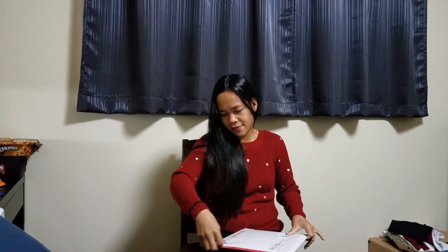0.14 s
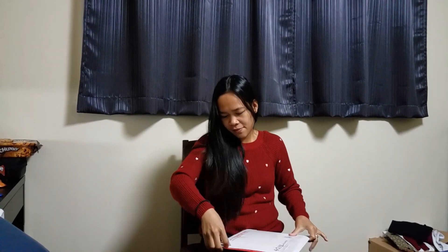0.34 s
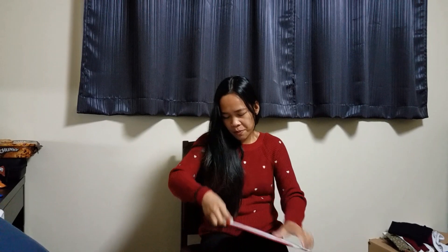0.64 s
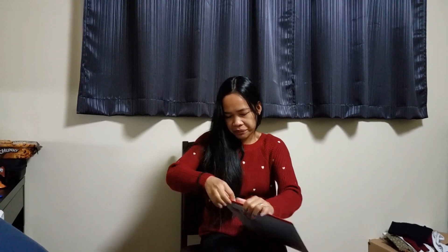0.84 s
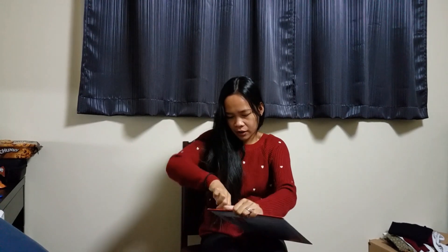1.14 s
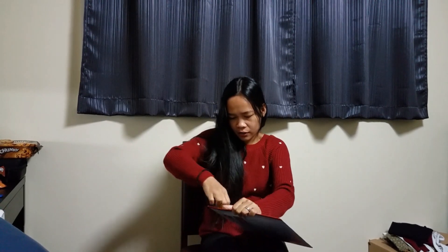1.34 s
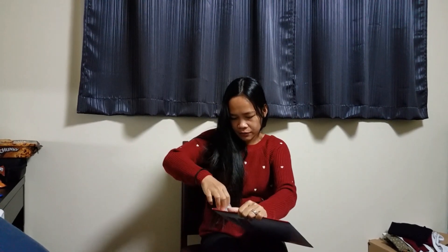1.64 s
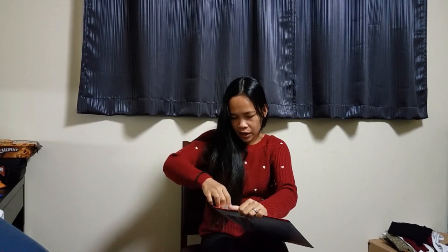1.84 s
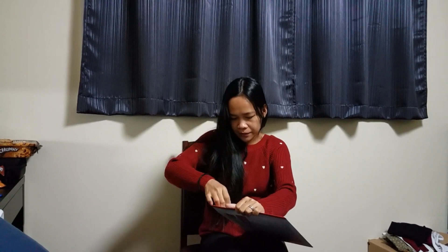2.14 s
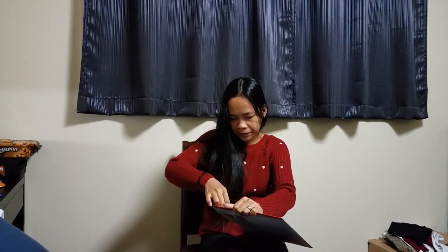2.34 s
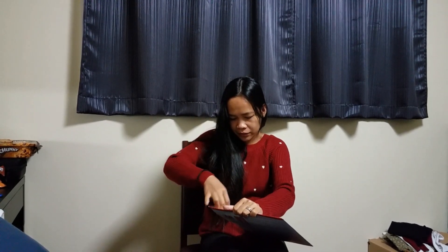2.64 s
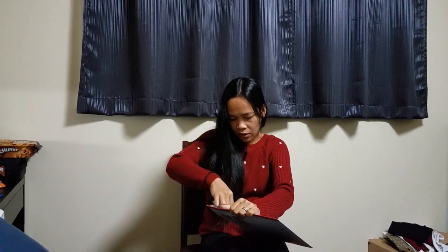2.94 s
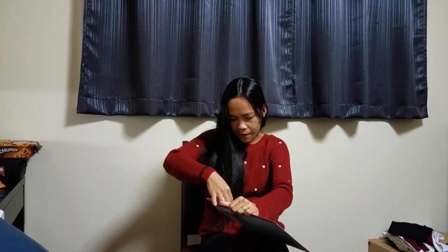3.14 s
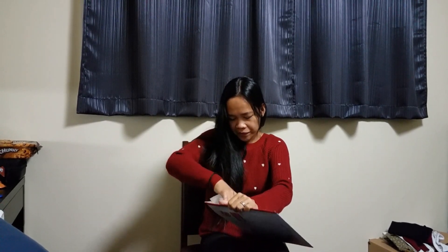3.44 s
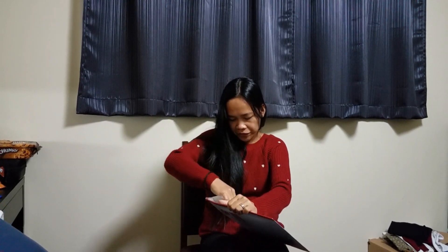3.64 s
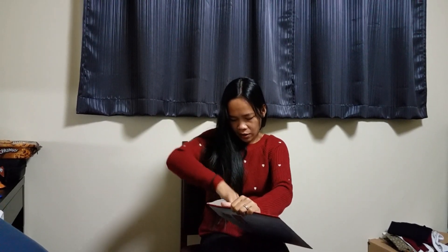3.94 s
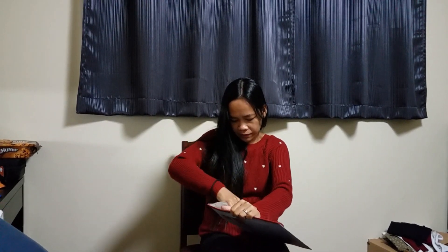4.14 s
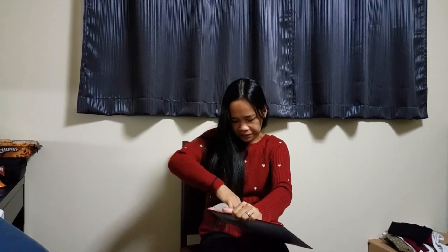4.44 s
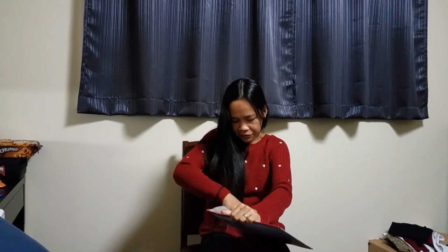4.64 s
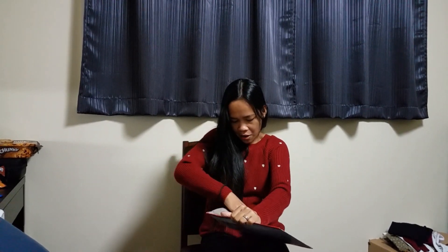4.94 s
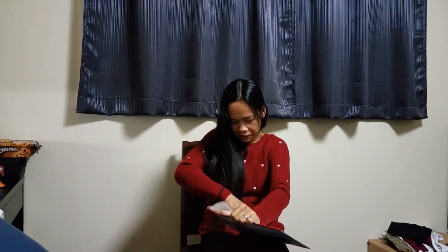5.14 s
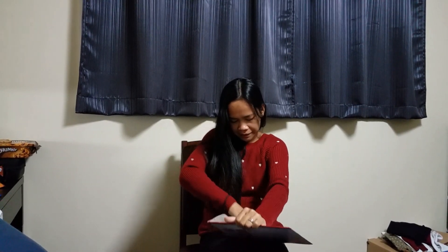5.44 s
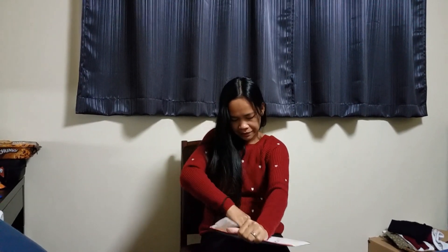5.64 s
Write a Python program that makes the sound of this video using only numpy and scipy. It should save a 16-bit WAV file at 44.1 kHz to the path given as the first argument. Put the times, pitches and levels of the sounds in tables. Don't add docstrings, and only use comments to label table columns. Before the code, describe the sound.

In a small quiet room, a few steps from a stereo microphone, hands pick at a stiff paper envelope. Faint ticks and rustles come first, then a sharp crackling rip at about 1.3 seconds. After a lull of light picking, tearing resumes in short pulls, with a loud pop just after 4 seconds and more crisp rips to the end. Faint hum and hiss lie underneath.

```python
import sys
import numpy as np
from scipy import signal
from scipy.fft import rfft, irfft
from scipy.io import wavfile
from scipy.ndimage import uniform_filter1d

SR = 44100
rng = np.random.default_rng(int(sys.argv[2]) if len(sys.argv) > 2 else 0)


def voltage_ratio(decibels):
    exponent = np.asarray(decibels, float) / 20
    return 10 ** exponent


def pcm_store(signal):
    levels = np.round(np.clip(np.atleast_2d(signal), -1, 1) * 32767)
    wavfile.write(sys.argv[1], SR, levels.astype(np.int16).T)


N = 255780
FLAT_HZ = 15000


def tearing():
    # [t/s, hold/s, crackle level/dB, sheet re crackle/dB, pouch re crackle/dB]
    rips = [(.202, .01, -46, -4.5, -3), (.214, 0.0054, -43, -4.5, -5), (.542, 0.067, -64.5, -8, -22),
            (1.0, .002, -72, -20, -22), (1.329, 0.02, -35.5, -11, -13.5), (1.353, 0.047, -28.5, -11.5, -16),
            (1.378, 0.028, -28, -7.5, -13.5), (1.51, 0.008, -50, -0.5, -4), (1.521, 0.0049, -48, -8.5, -16),
            (4.052, 0.016, -44.5, -12, -10), (2.024, 0.0018, -56.5, -8.5, -26),
            (2.194, 0.032, -56, -13.5, -8), (2.806, 0.02, -51, -28, -13), (3.34, 0.054, -55.5, -6, -0.5),
            (3.613, 0.049, -39.5, -10, -3), (3.64, 0.051, -38, -6.5, -1.5), (4.0715, .002, -38, 2.5, -23),
            (4.075, 0.12, -43.5, -8, -5), (4.2145, 0.0031, -37, 5, 1), (4.225, 0.031, -42, -8, 1),
            (4.865, 0.0046, -45.5, 2.5, -0.5), (5.11, 0.045, -36.5, -8.5, -13),
            (5.315, 0.01, -52.5, 1.5, -3.5), (5.426, 0.031, -55, -4.5, -9), (5.537, 0.01, -42.5, -23, 0.5),
            (5.552, 0.022, -32.5, -12.5, -23), (5.575, 0.053, -40, -5, -8), (5.76, .04, -55, 2.5, 10)]
    # [t of full force/s, then as for the rips]
    pulls = [(.062, 0.095, -63.5, -9, -25), (.77, 0.087, -64.5, -6, -11), (1.72, 0.28, -66, -1.5, -7),
             (2.395, 0.024, -49, -17, -14), (2.436, 0.046, -42.5, -12, -12), (2.5, .002, -59.5, 1, -18),
             (2.7, .002, -58.5, -10, -24), (2.87, 0.0017, -47.5, -6.5, -10), (2.99, 0.042, -44, -11.5, -12),
             (3.052, 0.033, -37, -8.5, -9), (3.308, .002, -53, -7, -23), (3.41, .002, -61, -16, -6),
             (3.464, 0.014, -45, -9.5, -22), (3.61, .002, -50, -22, -19), (3.9, 0.048, -60, -3.5, 2),
             (4.05, .002, -51, -12, -8.5), (4.5, 0.065, -57, -24, -21), (4.65, 0.03, -38, -9, -11),
             (4.7, 0.062, -53.5, -2.5, 1), (4.847, 0.0018, -53.5, 3, -2.5), (5.1, .002, -39.5, -9.5, -8.5),
             (5.17, 0.0067, -47, -19, -3), (5.49, 0.063, -47, -14.5, -11)]
    # [t/s, level/dB]
    grip = [(0, -73), (.35, -72.5), (.68, -84), (1.1, -72.5), (1.25, -80), (1.6, -72), (2.12, -83),
            (2.3, -77), (2.6, -63.5), (2.77, -75.5), (3.2, -63.5), (3.85, -63.5), (4.35, -61), (4.45, -58),
            (4.95, -65.5), (5.3, -57.5), (5.42, -67), (5.8, -55)]
    # [crackle/dB, sheet/dB, pouch/dB, flap/dB]
    grip_share = (2, -2, -2, -3)
    # [f/Hz, level/dB]
    fibre_tone = [(1760, -52), (3000, -1), (4130, -9.5), (4580, -3.5), (5590, -3.5), (6700, -1),
                  (9740, 1.5), (10700, 2.5), (15100, 3), (15700, -37)]
    # [f/Hz, level/dB]
    sheet_tone = [(700, -25), (1200, -6), (1550, -1.5), (2300, -3), (3100, -4), (4300, -11), (6000, -24),
                  (10000, -70)]
    # [f/Hz, width/Hz, level/dB]
    pouch_modes = [(545, 80, -6), (691, 170, -2), (790, 80, 2), (880, 113, -4), (990, 193, -8)]
    # [f/Hz, width/Hz, level/dB]
    flap_modes = [(212, 69, 7.5), (305, 250, -5)]

    t = np.arange(N // 32 + 1) * 32 / SR
    grip_db = np.interp(t, *np.transpose(grip)) + np.array(grip_share)[:, None]
    power = voltage_ratio(grip_db) ** 2
    power = power + force(rips, 6000, t) + force(pulls, 235, t)

    fibre = colour(clicks(4000, 2.4, 2.0, 8.8), fibre_tone)
    sheet = colour(clicks(1800, 3.2, 2.6, 6.5), sheet_tone)
    slips = clicks(700, 4.5, 2.4, 11)
    squeeze = 1 + 0.03 * slow_noise(int(0.06 * SR))
    pouch = sum(voltage_ratio(db) * sway(slips, hz * squeeze, 1.4 * width) for hz, width, db in pouch_modes)
    flap = np.zeros(N)
    for hz, width, db in flap_modes:
        flap += voltage_ratio(db) * resonate(resonate(slips, hz, 2 * width), hz, width)

    out = np.zeros(N)
    for level, layer in zip(np.sqrt(power), (fibre, sheet, pouch, flap)):
        out += np.interp(np.arange(N) / SR, t, level) * evened(layer)
    return voltage_ratio(-3.0) * out


def force(table, swell_db_per_s, t):
    # [crackle/dB per s, sheet, pouch, flap]
    fades = (332, 346, 285, 230)
    s, hold, db, sheet_db, pouch_db = np.transpose(table)[:, :, None]
    early = np.maximum(s - t, 0)
    late = np.maximum(t - s - hold, 0)
    flap_db = pouch_db - 6.5
    layers = []
    for rel_db, fade in zip((0, sheet_db, pouch_db, flap_db), fades):
        stroke_db = db + rel_db - swell_db_per_s * early - fade * late
        layers.append((voltage_ratio(stroke_db) ** 2).sum(0))
    return np.array(layers)


def clicks(per_s, spread_db, clump_db, clump_ms):
    size = voltage_ratio(spread_db * np.minimum(rng.exponential(1, N), 4)) * rng.choice([-1, 1], N)
    clump = slow_noise(max(int(clump_ms * SR / 1000), 2))
    happens = rng.random(N) < per_s / SR
    return size * happens * voltage_ratio(clump_db * clump)


def buckling_folds():
    # [t/s, peak level/dB, f/Hz, bare tick re ring/dB]
    pops = [(.212, -47, 540, -25), (.761, -56, 480, 10), (.953, -53, 506, -2), (1.329, -28.5, 760, -5.5),
            (1.649, -52, 520, -4), (2.197, -53.5, 780, -26), (2.738, -50, 760, -5), (2.869, -49, 850, -13),
            (2.998, -41, 835, -12), (3.049, -33.5, 766, 9), (3.333, -35, 790, -27), (3.434, -47, 400, -11),
            (3.633, -44, 805, -19), (3.6555, -24, 744, -11.5), (3.669, -28, 815, 0), (3.678, -42, 760, 0),
            (3.914, -39, 910, -3), (4.07, -33.5, 870, -13), (4.214, -12.5, 830, 5), (4.2248, -35, 704, -10),
            (4.229, -26.5, 730, 2), (4.643, -30, 910, -5), (4.669, -26, 765, 1), (4.865, -29.5, 870, 1),
            (5.115, -32.5, 790, -22), (5.151, -39, 780, -15), (5.314, -41, 800, -1), (5.432, -49, 630, -8),
            (5.538, -35.5, 744, -21), (5.5515, -30.5, 724, -7), (5.615, -38, 1080, -12),
            (5.756, -32.5, 980, -6), (1.367, -35, 800, 0), (1.395, -28.5, 750, 13), (3.615, -40, 830, -12),
            (3.7, -44, 830, -8), (3.711, -38, 830, -5), (4.243, -41, 740, -8), (4.271, -36, 710, -10),
            (4.286, -46, 680, -5), (5.104, -42, 750, -5), (5.127, -39, 780, -17), (5.567, -38, 800, -4),
            (5.58, -38, 710, -12), (5.607, -41, 720, -15), (4.2165, -19, 760, -7.5), (4.649, -35, 850, -12),
            (4.655, -32.5, 810, 6), (5.12, -33.5, 790, -8), (5.133, -37, 810, -10)]
    # [at a tick of 0 dB/ms, lost per dB of tick/ms]
    pop_ring = (1.09, 0.051)
    return snaps(ringing(pops, pop_ring), 2.57)


def cracking_fibres():
    # [t/s, peak level/dB, f/Hz, bare tick re ring/dB]
    cracks = [(.2118, -20, 9400, 0), (.2169, -17.5, 8650, -1), (.228, -31, 10900, -12),
              (.2416, -48, 8840, 4), (1.3303, -14, 12200, -2), (1.3527, -18, 11900, -14),
              (1.3674, -17, 9800, -10), (1.3777, -19.5, 10800, -34), (1.3843, -22, 12700, 2),
              (1.4058, -17.5, 13000, -8), (2.387, -30.5, 11100, 1), (2.8219, -39, 10900, 3),
              (2.8629, -29, 13800, 2), (3.051, -29, 11200, -7), (3.466, -27, 13600, -2),
              (3.6137, -33, 4930, -6), (4.0711, -32, 5240, -4), (4.65, -19, 11200, 5),
              (4.8662, -32.5, 9000, 22), (5.109, -15.5, 8840, -5.5), (5.5514, -32, 10850, -5),
              (5.616, -23.5, 6950, 8), (5.756, -38, 7560, -8), (4.872, -25, 8800, 6), (5.113, -23, 7000, 2),
              (5.151, -29, 11000, -6), (5.567, -27, 5500, 3), (5.603, -29, 11000, 2)]
    # [t/s, peak level/dB, f/Hz, bare
    # tick re ring/dB]
    small_ticks = [(0.0523, -36, 13100, 0), (0.531, -44, 13240, -3), (0.9993, -36, 9350, -1),
                   (1.054, -43.5, 7000, 10), (1.068, -53, 12000, -15), (1.243, -51, 12000, -9),
                   (1.276, -46, 12500, -4), (1.3064, -41, 11300, -14), (1.6522, -34.5, 8900, 13),
                   (1.71, -44.5, 4830, -13), (1.764, -52.5, 5200, -15), (1.779, -39.5, 7660, 0),
                   (1.8396, -30, 14200, 22), (1.9329, -38, 8060, 18), (2.19, -40.5, 6800, 14),
                   (2.2587, -40, 11200, 7), (2.32, -47, 11000, -7), (2.336, -48, 11000, 2), (2.37, -51, 10000, 0),
                   (2.606, -38, 3330, -5), (2.6202, -38, 5400, 8), (2.7387, -33, 8400, 41),
                   (3.4366, -44, 13500, -9), (3.543, -42, 11200, -2), (3.914, -32, 5950, 10),
                   (4.114, -27, 6000, 4), (5.3085, -37, 6460, 2), (5.4266, -35.5, 8460, 10),
                   (.2566, -37, 9000, 0), (.329, -44, 11000, 8), (1.574, -43, 8000, -2),
             (2.432, -32.5, 11000, -7), (2.44, -38, 11500, -4), (2.469, -39, 3520, -8),
             (2.497, -41, 10100, 0), (2.589, -53, 3000, -6), (2.591, -56, 11000, 3), (2.631, -50, 5400, -6),
             (2.685, -45, 8530, 0), (2.804, -45, 10900, 0), (2.874, -41, 3500, 4), (2.951, -51, 12000, 6),
             (2.986, -39, 12400, 4), (3.001, -36, 9000, -2), (3.625, -32, 4800, -3), (4.051, -33, 11700, 4),
             (4.653, -27, 2500, -3), (4.77, -39.5, 2600, -1), (4.87, -33, 2620, -2),
             (4.935, -46, 2400, -11), (1.7525, -48, 8500, 0), (2.312, -48, 11500, 0), (1.115, -54, 9000, 4),
             (1.165, -53, 12000, 0)]
    # [at a tick of 0 dB/ms, lost per dB of tick/ms]
    crack_ring = (0.12, 0.0075)
    return snaps(ringing(cracks + small_ticks, crack_ring), 0.3)


def flipping_creases():
    # [t/s, peak level/dB, f/Hz, ring/ms, bare tick re ring/dB]
    flips = [(0.2114, -49, 2100, 1.6, -1), (0.765, -49.5, 2670, 0.48, -9), (0.957, -53, 1840, 0.38, -10),
             (1.6496, -41.5, 2600, 0.46, 3), (1.7435, -52.5, 1750, 2, -20), (1.7512, -54, 1800, 1.5, -18),
             (2.8225, -43.5, 2800, 3.3, 11), (3.3767, -49, 1540, 3.1, -12), (3.3986, -52, 1950, 3.3, -9),
             (3.454, -47, 2740, 0.65, -3), (3.6341, -33, 2970, 0.9, 3.5), (4.0696, -34, 2080, 0.79, -13),
             (4.2133, -19.5, 2450, 0.44, -19), (4.2205, -20.5, 1275, 1.7, -7),
             (4.6428, -25, 2140, 0.47, -10), (4.8379, -28, 2340, 0.53, -12), (5.1098, -29.5, 3100, 0.5, 0),
             (5.7558, -36, 3400, 0.66, 6), (1.767, -69, 1820, 1.8, -20), (1.5152, -40, 3500, 0.49, -2),
             (1.527, -37.5, 3350, 0.61, 1), (4.2315, -26, 1420, 1, -31)]
    return snaps(flips, 1.3)


def knee_bumps():
    # [t/s, peak level/dB, f/Hz, ring/ms, bare tick re ring/dB]
    bumps = [
        (0.269, -52, 120, 8.4, 1),
        (0.774, -45, 219, 5.8, -15),
        (0.953, -48, 135, 1.9, -12),
        (1.33, -48, 260, 4.5, -10),
        (4.215, -40.5, 228, 8.5, 2),
    ]
    return snaps(bumps, 5.0)


def ringing(table, ring):
    return [(s, db, hz, ring[0] - ring[1] * tick_db, tick_db) for s, db, hz, tick_db in table]


def snaps(table, spread_ms, count=5):
    out = np.zeros(N)
    chances = rng.random((60, 2 * count))
    for (s, db, hz, ring_ms, tick_db), luck in zip(table, chances):
        knocks = np.zeros(2048)
        at = (luck[:count] * np.arange(count) / count * spread_ms * SR / 1000).astype(int)
        sign = np.where(luck[count:] < 0.5, -1, 1)
        np.add.at(knocks, at, sign * voltage_ratio(-6.5 * np.arange(count)))
        knocks = np.convolve(knocks, np.hanning(int(0.3 * SR / hz) + 3))[:2048]
        width = 550 / np.clip(ring_ms, 0.1, 60)
        ring = resonate(resonate(knocks, hz, 0.63 * width), hz, width)
        tick_hz, tick_width = min(1.66 * hz, 9500), 1.48 * hz
        tick = resonate(resonate(knocks, tick_hz, tick_width), tick_hz, tick_width)
        both = ring / abs(ring).max() + voltage_ratio(tick_db) * tick / abs(tick).max()
        add(out, s + 0.00076, voltage_ratio(db) * both / abs(both).max())
    return out


def evened(x):
    return x / np.sqrt(np.mean(x ** 2) + 1e-20)


def slow_noise(span):
    return evened(uniform_filter1d(uniform_filter1d(rng.standard_normal(N), span), span))


def read(points, hz):
    f, value = np.transpose(points)
    return np.interp(np.log(hz + 1), np.log(f + 1), value)


def add(mix, s, sound):
    part = mix[max(round(s * SR), 0):][:len(sound)]
    part += sound[:len(part)]


def resonate(x, hz, width):
    r = np.exp(-np.pi * max(width, 1) / SR)
    return 2 * signal.lfilter([1 - r], [1, -r * np.exp(2j * np.pi * hz / SR)], x).real


def sway(x, hz, width):
    turn = np.exp(2j * np.pi * np.cumsum(hz) / SR)
    r = np.exp(-np.pi * width / SR)
    slow = signal.lfilter([(1 - r) ** 2], np.convolve([1, -r], [1, -r]), x / turn)
    return 2 * (turn * slow).real


def colour(x, points, size=2048):
    hz = np.minimum(abs(np.fft.fftfreq(size, 1 / SR)), FLAT_HZ)
    gain_db = read([(40, -75)] + points, hz)
    log_gain = np.log(voltage_ratio(np.maximum(gain_db, -80)))
    taps = np.fft.ifft(np.exp(np.conj(signal.hilbert(log_gain)))).real
    half = size // 2
    if abs(taps[:half]).sum() <= abs(taps[half:]).sum():
        taps = np.roll(taps[::-1], 1)
    return signal.oaconvolve(x, taps[:half])[:N]


def room(x, count=4):
    turn = 2 * np.pi * 4.5 * np.arange(N) / SR
    heard = np.zeros((2, N))
    for k in range(count):
        share = np.maximum(np.cos(turn - k * np.pi / 2), 0)
        heard += signal.fftconvolve((share * x)[None], echoes(), axes=1)[:, :N]
    low = signal.butter(2, 950, fs=SR, output="sos")
    apart = signal.sosfiltfilt(low, heard - heard.mean(0))
    return heard - 0.55 * apart


def echoes():
    # [delay/ms, level/dB]
    walls = [(2.2, -9), (6.8, -7), (8.3, -11), (14.2, -6), (16.5, -9)]
    # [f/Hz, t60/s]
    decay = [(200, 0.066), (800, 0.21), (2500, 0.22), (8000, 0.15), (15000, 0.098)]

    taps = np.zeros((2, SR // 2))
    at = np.arange(200, SR // 2 - 20, 20) + rng.integers(0, 20, (2, (SR // 2 - 201) // 20))
    np.put_along_axis(taps, at, rng.choice([-1., 1.], at.shape), 1)
    hz, t, z = signal.stft(taps, SR, nperseg=256)
    t60 = np.maximum(read(decay, hz), 0.03)[:, None]
    tail = signal.istft(z * voltage_ratio(-60 * t / t60), SR, nperseg=256)[1]
    tail *= voltage_ratio(-1.5) / np.linalg.norm(tail[0])

    for (ms, db), (side, shift) in zip(walls, rng.uniform(-1, 1, (len(walls), 2))):
        at = (ms * SR / 1000 + 8 * shift + np.array([1, -1]) * side * 12).astype(int)
        for port in (0, 1):
            port_db = db + (2 * port - 1.0) * side
            add(tail[port], at[port] / SR, voltage_ratio(port_db) * np.array([0.2, 0.5, 0.2]))

    near = (9 + rng.random((2, 4)) * 1.0 * SR / 1000).astype(int)
    np.add.at(tail, ([[0], [1]], near), voltage_ratio(-13) * rng.choice([-1., 1.], near.shape))
    lag = np.array([[0], [0.45 + 0.5 * rng.uniform(-1, 1)]])
    tail[:, :13] += np.sinc(np.arange(13) - 6 - lag) * np.hanning(15)[1:-1]
    return tail


def stillness():
    # [f/Hz, level/dB]
    still = [(15, -35), (25, -4.5), (70, -18.5), (82, -13), (102, -1), (140, -16.5), (307, -10.5),
             (351, -26), (391, -13.5), (424, -26), (460, -18), (1180, -26), (1460, -25.5), (7380, -38),
             (15700, -28.5)]
    # [f/Hz, correlation]
    likeness = [(60, 0.77), (240, 0.67), (950, 0.022), (3770, 0.0092), (15000, 0.032)]
    # [t/s, level/dB]
    rumble = [
        (0.0, -82),
        (0.24, -71),
        (0.66, -83),
        (0.98, -70),
        (1.15, -75),
        (2.91, -79),
        (2.99, -71.5),
        (4.78, -70),
        (5.8, -75),
    ]
    # [f/Hz, width/Hz, level/dB]
    hum_hz, hum_width, hum_db = (100.2, 16, -69)

    frames, hz = N // 512 + 5, np.fft.rfftfreq(2048, 1 / SR)
    a, b, c, d, patches = rng.standard_normal((frames, 1025, 5)).T
    patches = evened(uniform_filter1d(uniform_filter1d(patches, 30, 0), 8, 1))
    same = np.clip(read(likeness, hz), -1, 1)[:, None]
    left = a + 1j * b
    right = same * left + np.sqrt(1 - same ** 2) * (c + 1j * d)
    s, rumble_db = np.transpose(rumble)
    swell_db = np.interp(np.arange(frames) * 512 / SR, s, rumble_db - rumble_db.mean())
    level_db = read(still, np.minimum(hz, FLAT_HZ))[:, None] + 0.28 * patches
    level_db = level_db + (hz < 80)[:, None] * swell_db
    z = np.array([left, right]) * voltage_ratio(level_db)
    air = voltage_ratio(-61.5) * evened(signal.istft(z, nperseg=2048, noverlap=1536)[1][:, :N])

    steady = np.cos(2 * np.pi * hum_hz * np.arange(N) / SR)
    wobble = evened(resonate(rng.standard_normal(N), hum_hz, hum_width))
    return air + voltage_ratio(hum_db) * (steady + 0.6 * wobble)


def scene():
    paper = tearing() + buckling_folds() + cracking_fibres() + flipping_creases() + knee_bumps()
    paper = signal.sosfilt(signal.butter(2, 110, "high", fs=SR, output="sos"), paper)
    return voltage_ratio(-3.0) * room(paper) + stillness()


def roll_off(x):
    return signal.sosfilt(signal.butter(12, 15960, fs=SR, output="sos"), x)


def record(dry):
    # [f/Hz, left minus right/dB]
    lean = [(60, -2.5), (180, -1.5), (550, -3), (1650, 0), (4970, 3.5), (15000, 5.5)]
    hz = np.fft.rfftfreq(N, 1 / SR)
    lean_db = read(lean, hz) / 2
    edge_db = -90 * (hz > 15930)
    mix = irfft(rfft(dry) * voltage_ratio(np.array([lean_db, -lean_db]) + edge_db), N)
    return roll_off(mix)


dry = scene()
out = record(dry)
pcm_store(out)
```